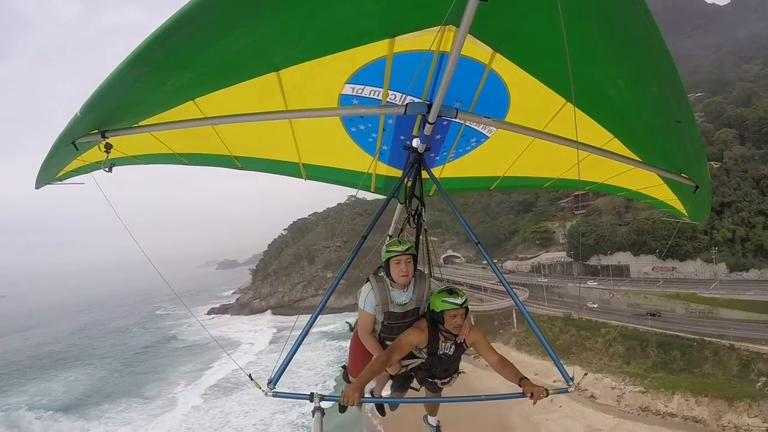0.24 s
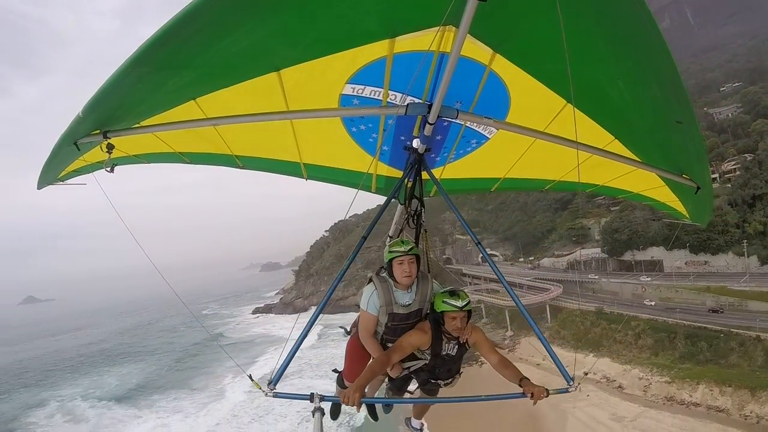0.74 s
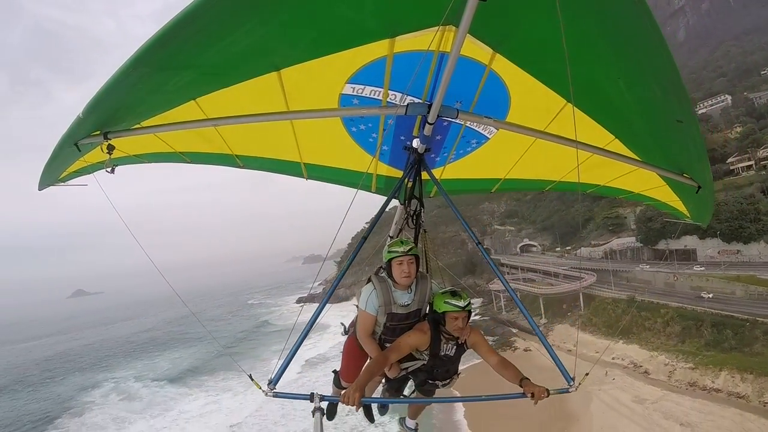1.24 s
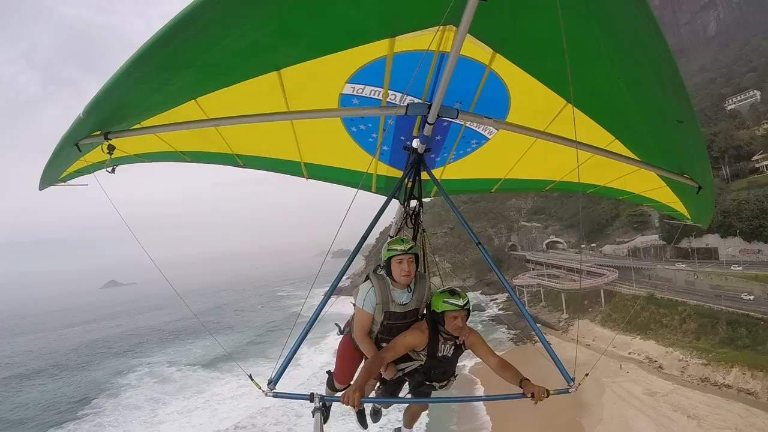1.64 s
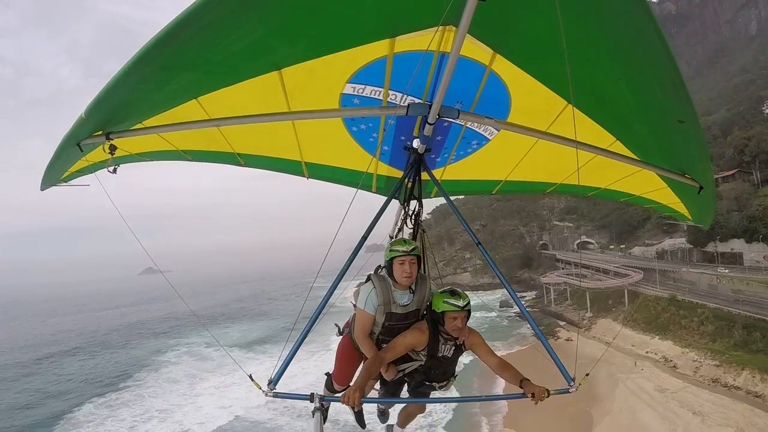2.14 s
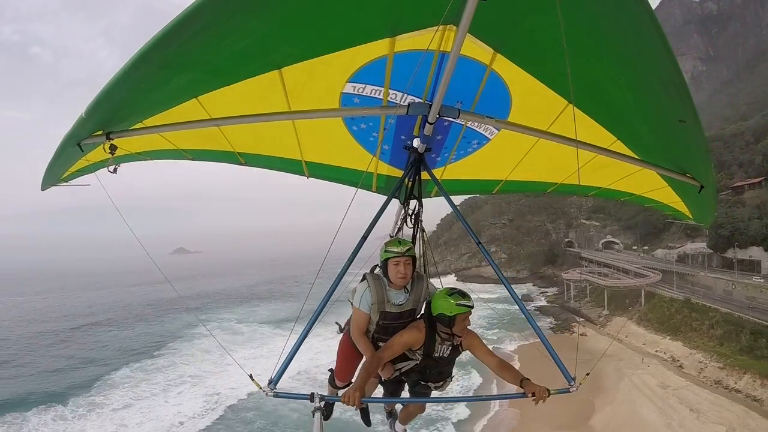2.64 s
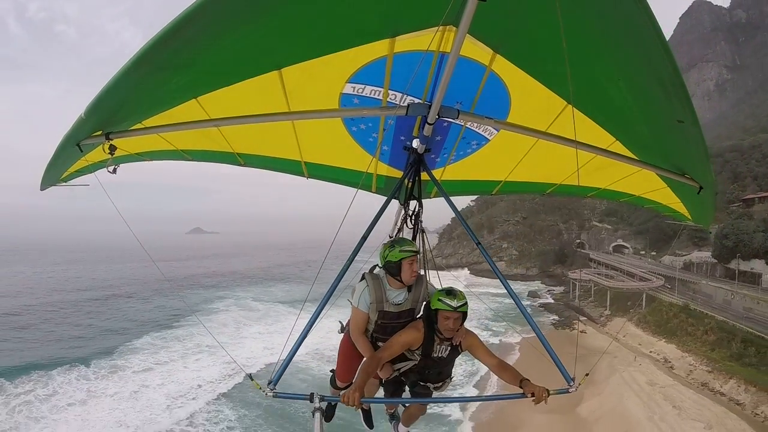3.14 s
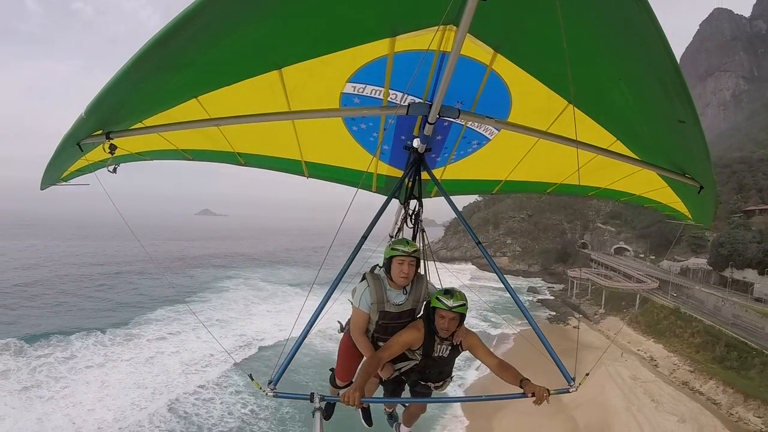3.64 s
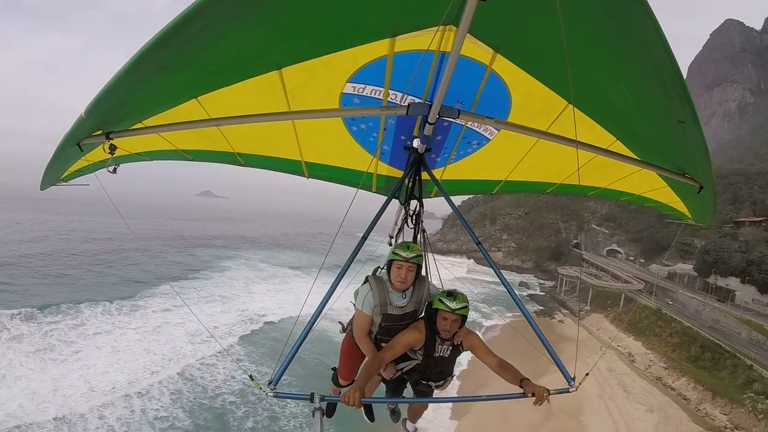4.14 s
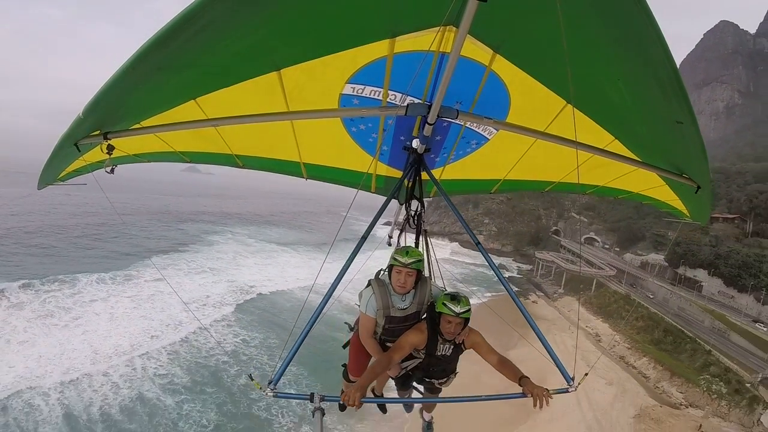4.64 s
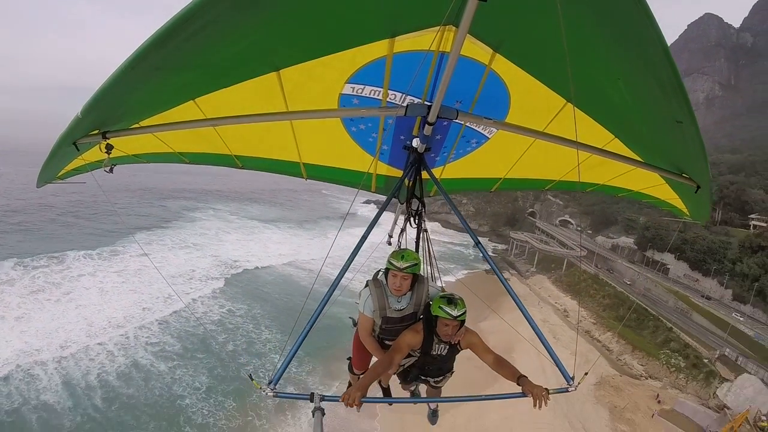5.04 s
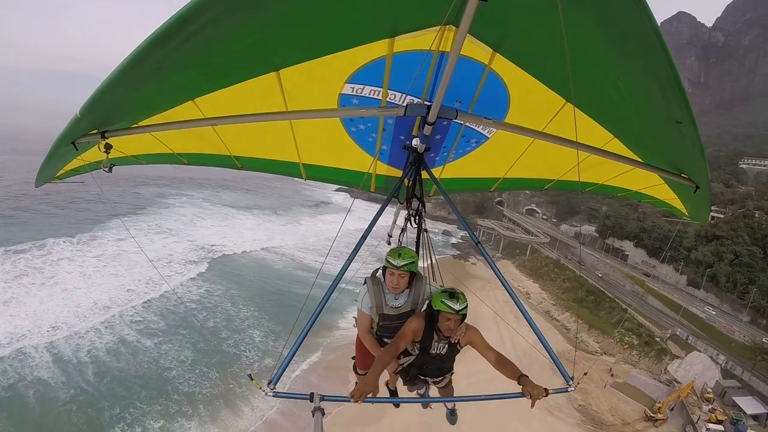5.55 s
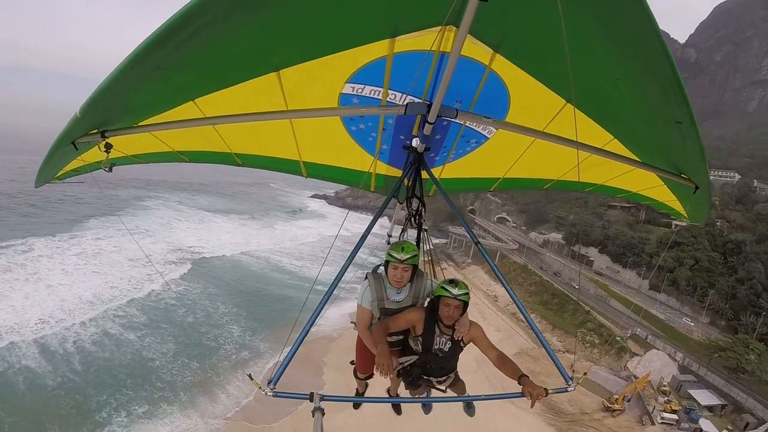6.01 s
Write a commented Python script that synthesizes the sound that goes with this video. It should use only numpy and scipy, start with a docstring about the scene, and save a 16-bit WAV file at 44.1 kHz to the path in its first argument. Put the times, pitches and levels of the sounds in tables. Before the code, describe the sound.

Continuous low buffeting from wind shaking a glider's pole and frame: a bass drone throbbing quickly and irregularly, wavering boomy resonances around it, a darker broad rush on top that eases early and returns slightly later. Hollow little mount knocks come singly or in small groups, ending in a hurried rattle. Everything is very close to the microphone, outdoors, with no reverberation.

```python
"""Hang glider pole in the wind

A camera on a long pole rides a hang glider high above a coast. Turbulence hisses over its microphone port
as coloured noise; the same wind shakes pole and frame, heard as randomly driven resonances. The two lowest
strong modes of the pole hum and beat against each other, with brief dips; now and then the mount knocks,
each knock a sum of decaying rings. A limiter holds down the loudest hum and shaking."""
import sys
import numpy as np
from scipy import signal
from scipy.fft import rfft, irfft, next_fast_len
from scipy.io import wavfile
from scipy.ndimage import uniform_filter1d, map_coordinates

SR = 44100
rng = np.random.default_rng(int(sys.argv[2]) if len(sys.argv) > 2 else 0)


def digitize_waveform(pressure):
    """Quantize a signal to 16-bit integers and store it at the path in sys.argv[1].

    Rows of a 2-D input are taken as channels; values are limited to [-1, 1].
    """
    field = np.atleast_2d(pressure).T
    bounded = np.clip(field, -1, 1)
    quanta = np.round(bounded * 32767).astype(np.int16)
    wavfile.write(sys.argv[1], SR, quanta)


N = 276864


def amp(db):
    """Level law: decibels to amplitude gain."""
    return 10 ** (np.asarray(db) / 20)


def unit(x):
    """Normalisation: x scaled to rms 1."""
    return x / np.sqrt(np.mean(x ** 2))


def curves(rows):
    """Linear interpolation: one value per sample for each column after the time."""
    times, *columns = np.transpose(rows)
    return [np.interp(np.arange(N) / SR, times, column) for column in columns]


def wobble(rate):
    """Slow random modulation: a smooth curve through random knots, rate knots a second."""
    knots = rng.standard_normal(int(N * rate / SR) + 4)
    return map_coordinates(knots, [np.arange(N) * rate / SR])


def filtered(x, response):
    """Linear filtering: the spectrum of x times a response of frequency."""
    size = next_fast_len(N + SR)
    spectrum = rfft(x, size) * response(np.fft.rfftfreq(size, 1 / SR))
    return irfft(spectrum, size)[:N]


def rush(colour, patchy_db):
    """Turbulent noise: random noise of a given spectrum and rms 1, with faint patches of random gain."""
    z = signal.stft(rng.standard_normal(N), nperseg=512)[2]
    across_f = uniform_filter1d(rng.standard_normal(z.shape), size=6, axis=0)
    patches = uniform_filter1d(across_f, size=12, axis=1)
    noise = signal.istft(z * amp(patchy_db * unit(patches)), nperseg=512)[1][:N]
    f, db = np.transpose(colour)
    return unit(filtered(noise, lambda hz: amp(np.interp(np.log(hz + 1), np.log(f + 1), db))))


# air flow over the port: t/s, rush level/dB before brightening, fine hiss level/dB before its wobble
AIR_FLOW = [(0.0, -23.5, -45.5), (.3, -24.5, -47), (0.6, -24.5, -48), (.9, -25.5, -49.5),
            (1.19, -25.5, -50.5), (1.5, -27.5, -52.5), (1.85, -28.5, -54.5), (2.2, -27.5, -53.5),
            (2.64, -27, -50.5), (3, -27.5, -51.5), (3.38, -27.5, -53.5), (3.94, -26, -52),
            (4.5, -26.5, -52.5), (5.16, -27, -53), (5.6, -26, -53), (5.96, -26, -51.5), (6.28, -25, -51.5)]
# spectrum of the turbulence at the port: f/Hz, relative density/dB
RUSH_COLOUR = [(15, 4.5), (70, 13), (110, 8.5), (190, 4), (300, 3), (480, 2), (620, -0.5), (800, -1),
               (1100, -4.5), (1500, -8.5), (2000, -12.5), (3000, -18), (4300, -24.5), (7000, -50.5),
               (15000, -92.5)]
# spectrum of the finest eddies: f/Hz, relative density/dB
HISS_COLOUR = [(2500, -12.5), (4300, -6), (5200, -2.5), (6800, -4), (8500, -14.5), (11500, -30),
               (15000, -35)]
BRIGHTER = 0.23  # dB of treble per octave, per dB of stronger flow


def air():
    """Flow noise: turbulence at the port is a broad rush, brighter in stronger flow, and a fine hiss."""
    flow_db, fine_db = curves(AIR_FLOW)
    broad = rush(RUSH_COLOUR, patchy_db=0.61)
    # first-order form of a spectral tilt, in octaves of 1 + f/kHz
    treble = filtered(broad, lambda hz: np.log2(1 + hz / 1000) * np.log(10) / 20)
    broad = broad + BRIGHTER * (flow_db - flow_db.mean()) * treble
    hiss_gain = amp(fine_db + 0.4 * wobble(5.4))
    return amp(flow_db) * broad + hiss_gain * rush(HISS_COLOUR, patchy_db=0.5)


def shaken(modes, db):
    """Forced resonance: lumpy buffeting rings some modes; the mount's padding passes little treble."""
    buffet = amp(2.2 * wobble(7.8)) * rng.standard_normal(N)

    def ring(f):
        total = 0
        for k, (centre, width, level) in enumerate(modes):
            resonance = 1j * f * np.sqrt(width) / (centre * centre - f * f + 1j * f * width)
            total = total + (-1) ** k * amp(level) * resonance  # neighbours in opposite sign
        return total

    return amp(db) * unit(filtered(buffet, lambda f: ring(f) / (1 + (f / 700) ** 4)))


EVEN = 0.85  # how much of a narrow mode's random fading is evened out, 0-1


def narrow_mode(hz, width_hz, db):
    """Narrow-band noise: one mode kept ringing by the buffeting, its pitch wavering within its width."""
    ring = filtered(rng.standard_normal(N), lambda f: 1 / (1 + ((f - hz) / width_hz) ** 2))
    envelope = np.abs(signal.hilbert(unit(ring), next_fast_len(N))[:N])
    evened = unit(ring / (envelope + 0.13) ** EVEN)
    return amp(db) * evened


# brief dips of the hum, bell-shaped: t/s, depth/dB, standard deviation/s
HUM_DIPS = [(0.615, 6.5, 0.015), (3.635, 10.5, 0.01), (5.24, 6, 0.017), (5.55, 5, .012), (5.86, 5.5, .015),
            (6.055, 7.5, 0.011)]


def dip_db():
    """Gaussian level envelope: how far the hum has sunk, dB."""
    t = np.arange(N) / SR
    return sum(depth * np.exp(-((t - s) / spread) ** 2 / 2) for s, depth, spread in HUM_DIPS)


# broad modes of pole and frame, two low then three high: f/Hz, width/Hz, relative level/dB
FRAME_MODES = [(66.8, 12, -8), (104.3, 20, -11), (164, 40, -16.5), (284, 60, -18), (445.4, 55, -18.5)]
# shaking of the frame before the hum's dips add to it: t/s, low modes level/dB, high modes level/dB
FRAME_SHAKING = [(0, -28, -41), (.6, -27.5, -31.5), (1.25, -31.5, -34), (1.6, -34.5, -34),
                 (2.1, -30.5, -34), (2.5, -29.5, -33.5), (3.1, -31, -40), (3.7, -28, -33.5),
                 (4.2, -31.5, -35), (4.9, -30, -34), (5.55, -26.5, -35.5), (5.8, -26, -31.5),
                 (6.05, -24, -28), (6.28, -25.5, -29)]
# four narrow modes of the frame: f/Hz, width/Hz
NARROW_MODES = [(85.75, 3), (135, 3), (160.5, 4), (230.6, 3)]
# their swelling and fading, ahead of the limiter: t/s, then one level/dB for each mode
NARROW_LEVELS = [(0.0, -25, -45.5, -37, -27.5), (0.05, -21, -45, -48, -36), (0.09, -21.5, -35, -43, -36),
                 (0.23, -29, -33, -48.5, -36.5), (0.28, -21, -33, -37, -44), (0.33, -25.5, -27, -49, -37),
                 (0.38, -23, -21.5, -37, -32.5), (0.59, -24.5, -31.5, -48, -45),
                 (0.68, -20, -34.5, -29, -37), (0.79, -33, -48, -40, -32.5), (0.89, -26, -31.5, -28.5, -43),
                 (0.98, -26, -22.5, -38, -30), (1.08, -27, -36.5, -39, -31), (1.28, -19.5, -30, -48, -48),
                 (1.64, -37, -40.5, -39.5, -40), (1.7, -30.5, -37, -54.5, -46),
                 (1.77, -29, -31.5, -51, -40.5), (2.15, -28, -34, -43.5, -34.5),
                 (2.22, -38.5, -20.5, -48.5, -38.5), (2.27, -33.5, -47, -40, -50),
                 (2.33, -30.5, -25.5, -37, -34), (2.38, -41, -21.5, -26.5, -43), (2.43, -27, -36, -44, -44),
                 (2.52, -30.5, -23, -27.5, -29), (2.59, -24.5, -39.5, -41.5, -41),
                 (2.64, -27.5, -34, -31.5, -47), (2.74, -23, -29.5, -45, -31), (2.83, -35, -31, -32.5, -42),
                 (2.89, -27, -24.5, -40, -36), (3.09, -27, -46, -44, -44), (3.22, -33.5, -29.5, -36.5, -32),
                 (3.29, -25, -29, -44.5, -39.5), (3.39, -33, -36, -46, -35), (3.5, -22.5, -45, -38, -33.5),
                 (3.55, -28.5, -25.5, -47.5, -34.5), (3.62, -23.5, -26.5, -22, -50),
                 (3.69, -22, -30.5, -44, -38.5), (3.86, -25.5, -25, -33.5, -37),
                 (3.95, -24.5, -22, -50.5, -29.5), (4.0, -27.5, -40, -37, -43),
                 (4.13, -22, -34.5, -36.5, -39.5), (4.21, -28, -49, -47, -34),
                 (4.27, -25, -28, -33.5, -39.5), (4.35, -19.5, -42, -41, -32.5),
                 (4.4, -37.5, -34, -39, -33.5), (4.51, -24, -42, -37.5, -47),
                 (4.6, -22.5, -29.5, -48.5, -39), (4.96, -30.5, -29.5, -30.5, -43),
                 (5.11, -29.5, -23, -41, -37.5), (5.16, -29, -32.5, -31, -38.5),
                 (5.44, -18.5, -33, -38, -42.5), (5.51, -29, -29, -37, -35), (5.54, -15, -28.5, -31, -50),
                 (5.72, -27.5, -27, -37, -44), (5.77, -28, -42, -25, -28), (5.82, -25, -50, -36.5, -37.5),
                 (5.98, -22.5, -21, -29.5, -33.5), (6.17, -19.5, -43.5, -29.5, -32.5),
                 (6.23, -21, -24.5, -36.5, -33), (6.28, -34.5, -27.5, -36, -31)]
# slow sway of the whole pole, ahead of the limiter: t/s, level/dB
POLE_SWAY = [(0.0, -28), (0.5, -31), (0.58, -17.5), (1.64, -42), (1.77, -21), (1.87, -42), (2.01, -22.5),
             (2.1, -31.5), (3.34, -24.5), (3.39, -38.5), (3.6, -24.5), (3.79, -39.5), (3.93, -25),
             (4.27, -28.5), (5.6, -20), (5.79, -38), (5.86, -18.5), (6.07, -32), (6.24, -19.5),
             (6.28, -33.5)]
SWAY_HZ, SWAY_WIDTH_HZ = 25.7, 9.2
TAKE_OVER = 0.24  # dB more shaking per dB that the hum dips


def frame():
    """Modal superposition: broad modes rise as the hum dips; narrow ones each follow a level curve."""
    take_over_db = TAKE_OVER * np.minimum(dip_db(), 8)
    low_db, high_db = np.array(curves(FRAME_SHAKING)) + take_over_db
    narrow_db = curves(NARROW_LEVELS)
    narrow = sum(narrow_mode(hz, width_hz, db) for (hz, width_hz), db in zip(NARROW_MODES, narrow_db))
    sway = narrow_mode(SWAY_HZ, SWAY_WIDTH_HZ, *curves(POLE_SWAY))
    return shaken(FRAME_MODES[:2], low_db) + shaken(FRAME_MODES[2:], high_db) + narrow + sway


# knocks of the mount: t/s, main ring level/dB before its swell, main ring f/Hz, main ring t60/s,
# upper rings level/dB, their brightness/(dB per octave)
MOUNT_KNOCKS = [(0.24, -4, 463, 0.037, -22.5, 0), (0.701, -0.5, 468, 0.031, -30, 4),
                (0.873, 0, 465, 0.038, -23, -3), (1.08, -6, 437, 0.051, -26.5, 3),
                (2.101, 0.5, 450, 0.032, -15.5, -2), (2.271, -4, 440, 0.035, -28, -4),
                (2.4424, 8, 440, 0.033, -8.5, -5), (2.455, -2, 455, .04, -30, 0),
                (4.605, -6.5, 395, 0.059, -30, -4), (4.912, -2, 495, 0.056, -38, -2),
                (4.919, -7.5, 505, 0.066, -17, 18), (5.036, 5, 488, 0.035, -36, -1),
                (5.118, -7, 410, 0.078, -34, 0), (5.1235, -4, 517, .03, -16.5, 4),
                (5.197, 4, 487, 0.033, -24, 0), (5.306, -10, 430, 0.056, -26, -5),
                (5.358, 1.5, 470, 0.036, -25, 0), (5.736, 2, 446, 0.033, -22, -4),
                (5.752, -6, 462, 0.052, -22, 0), (5.918, -1, 465, 0.04, -29, 7),
                (5.956, -4, 445, 0.041, -33, 1), (5.976, -3, 450, .037, -27, 3),
                (5.992, -8, 480, .033, -32, 0), (6.013, -5, 480, 0.034, -22, 2),
                (6.024, -7, 470, .035, -32, 0), (6.042, -6, 470, .035, -32, 4),
                (6.072, -5, 446, 0.035, -26, 1), (6.086, 0, 450, 0.032, -22, 0)]
# rings of the mount above its main one: f/Hz, level/dB before brightness and scatter, t60/s
UPPER_RINGS = [(716, -5.5, 0.097), (806, -5.5, 0.055), (880, -2.5, 0.043), (600, -6.5, 0.04),
               (1150, -12, .035)]
# ring just under the main one: pitch ratio, level/dB before the swell, t60/s
NEIGHBOUR, NEIGHBOUR_DB, NEIGHBOUR_T60 = 0.892, -11, 0.038
MAIN_LAG_S = 0.0019  # the main ring sets in after the upper ones
CRACK_DB, CRACK_T60 = -14, 0.016  # short dry crack at the contact: dB relative to the upper rings' level, s


def knocks():
    """Impact and free decay: rattle and upper rings start first, the main ring swells over a few cycles."""
    out, t = np.zeros(N + SR), np.arange(SR // 5) / SR
    rattle_band = signal.butter(3, [550, 950], "bandpass", fs=SR, output="sos")
    crack_band = signal.butter(2, [900, 2300], "bandpass", fs=SR, output="sos")
    for s, db, hz, ring_s, upper_db, bright_db in MOUNT_KNOCKS:
        swell = (1 - np.exp(-np.maximum(t - MAIN_LAG_S, 0) / 0.0042)) ** 3
        main = amp(-60 * t / ring_s) * np.sin(2 * np.pi * hz * t)
        # the neighbouring ring beats against it and cuts the blow short
        side_turns = hz * NEIGHBOUR * t + (1 - NEIGHBOUR) * hz * 0.0071
        side = amp(NEIGHBOUR_DB - 60 * t / NEIGHBOUR_T60) * np.sin(2 * np.pi * side_turns)
        upper = 0
        for f, level, t60 in UPPER_RINGS:
            tilt_db = bright_db * np.log2(f / UPPER_RINGS[1][0])
            ring_db = level + tilt_db + rng.normal(0, 0.89) - 60 * t / t60
            turns = f * (t - 0.003) + rng.normal(0, 0.1)
            upper = upper + amp(ring_db) * np.sin(2 * np.pi * turns)
        rattle = unit(signal.sosfilt(rattle_band, rng.standard_normal(len(t))))
        rattle = 0.07 * amp(-60 * t / 0.07) * rattle
        crack = unit(signal.sosfilt(crack_band, rng.standard_normal(len(t))))
        crack = amp(CRACK_DB - 60 * t / CRACK_T60) * crack
        rise = (1 - np.exp(-t / 0.0023)) ** 2
        blow = amp(db) * swell * (main + side) + amp(upper_db) * rise * (upper + rattle + crack)
        start = round(s * SR)
        out[start:][:len(t)] += blow
    return out[:N]


# the two strong pole modes: t/s, beat f/Hz of the upper mode above the lower, lower over upper level/dB,
# swing level/dB before dips and limiter
POLE_MODES = [(0.0, 10.8, 9.3, -11.3), (0.11, 16.26, 13.1, -11.2), (0.22, 12.63, 7.8, -10.9),
              (0.33, 12.92, 12.9, -11.3), (0.44, 14.72, 11.4, -11.6), (0.55, 14.49, 14.2, -11.4),
              (0.66, 13.6, 5.0, -13.8), (0.77, 8.1, 23.1, -8.8), (0.88, 7.59, -4.6, -11.7),
              (0.99, 10.98, -13.3, -10.6), (1.1, 7.36, -9.8, -10.2), (1.21, 12.65, -15.8, -9.8),
              (1.32, 8.25, 1.4, -11.1), (1.43, 12.95, 5.8, -10.5), (1.54, 9.43, 5.9, -9.9),
              (1.65, 9.38, 4.6, -9.8), (1.76, 11.42, 4.2, -11.2), (1.87, 9.33, 11.6, -11.3),
              (1.98, 12.08, -8.0, -10.0), (2.09, 9.73, -2.9, -11.4), (2.2, 14.78, -1.5, -12.8),
              (2.31, 11.49, -6.7, -10.9), (2.42, 13.21, -12.1, -10.9), (2.53, 10.41, -12.0, -12.2),
              (2.64, 12.88, 0.6, -10.7), (2.75, 10.26, 9.8, -11.8), (2.86, 11.59, -6.4, -9.6),
              (2.97, 12.45, -1.5, -12.7), (3.08, 12.76, 19.6, -9.5), (3.2, 12.09, 8.8, -11.3),
              (3.31, 9.84, -10.2, -9.7), (3.42, 14.23, -11.6, -10.1), (3.53, 8.68, -1.0, -13.3),
              (3.64, 1.72, 0.2, -15.3), (3.75, 6.79, -12.0, -11.2), (3.86, 15.27, 13.4, -13.7),
              (3.97, 14.89, -18.7, -9.9), (4.08, 10.05, 15.7, -10.7), (4.19, 13.12, 2.9, -11.3),
              (4.3, 9.32, 2.8, -11.3), (4.41, 12.99, 19.4, -10.6), (4.52, 11.24, 15.2, -10.0),
              (4.63, 15.31, 8.6, -10.5), (4.74, 11.45, 18.3, -9.4), (4.85, 14.16, 3.6, -12.0),
              (4.96, 11.72, 1.3, -11.5), (5.07, 13.7, 4.4, -11.4), (5.18, 8.75, 16.8, -11.0),
              (5.29, 10.02, 7.5, -12.3), (5.4, 11.64, 11.7, -12.0), (5.51, 16.87, -7.9, -16.0),
              (5.62, 5.59, 19.0, -12.9), (5.73, 10.66, 20.7, -9.2), (5.84, 13.26, 4.5, -14.9),
              (5.95, 9.1, 4.0, -15.3), (6.06, 17.04, -11.4, -16.4), (6.17, 15.76, -6.8, -12.0),
              (6.28, 11.63, 1.7, -16.8)]
LOW_MODE_HZ, START_TURNS = 48.42, 0.374  # lower mode before its wavering; lead of the upper at the start
FLUTTER_DB = 0.4  # random level flutter of each mode


def pole():
    """Beating: two modes close in frequency add as phasors, each fluttering a little."""
    beat_hz, lean_db, swing_db = curves(POLE_MODES)
    lower_share = 1 / (1 + amp(-2 * lean_db))  # share of the power
    beat_turns = np.cumsum(beat_hz) / SR + START_TURNS
    lower = np.sqrt(lower_share) * amp(FLUTTER_DB * wobble(11))
    upper = np.sqrt(1 - lower_share) * amp(FLUTTER_DB * wobble(10)) * np.exp(2j * np.pi * beat_turns)
    # both pitches waver together
    carrier_turns = np.cumsum(LOW_MODE_HZ + 0.68 * wobble(6.0)) / SR + rng.random()
    hum = np.real((lower + upper) * np.exp(2j * np.pi * carrier_turns))
    return np.sqrt(2) * amp(swing_db - dip_db()) * hum


LIMIT, LIMIT_GAIN_DB = 0.6, 0.5  # amplitude at which the limiter acts; its gain in dB for weak shaking


def limiter(shake):
    """Amplitude limiting: the recorder's limiter holds down the loudest hum and shaking."""
    envelope = np.abs(signal.hilbert(shake, next_fast_len(N))[:N])
    return amp(LIMIT_GAIN_DB) * shake / (1 + (envelope / LIMIT) ** 6) ** (1 / 6)


def scene():
    """Superposition: limited hum and shaking of pole and frame, with air and knocks, at one microphone."""
    return (limiter(pole() + frame()) + air() + knocks())[None]


TOP_HZ = 15700  # band limit


def record(dry):
    """Saturation and band limiting: the input stage rounds off the highest peaks, then cuts the top."""
    rounded = dry[0] / (1 + np.abs(dry[0] / 0.8) ** 8) ** (1 / 8)
    return filtered(rounded, lambda hz: hz < TOP_HZ)[None]


dry = scene()
out = record(dry)
digitize_waveform(out)
```